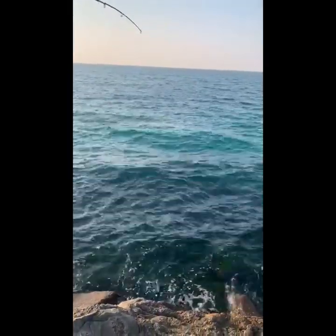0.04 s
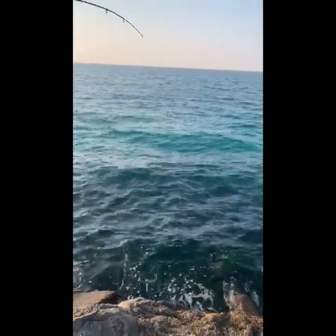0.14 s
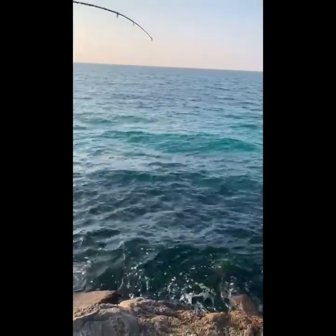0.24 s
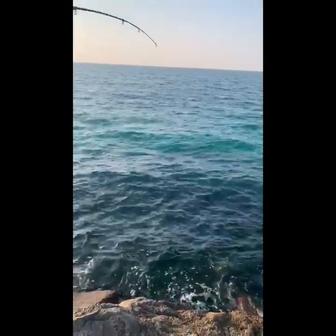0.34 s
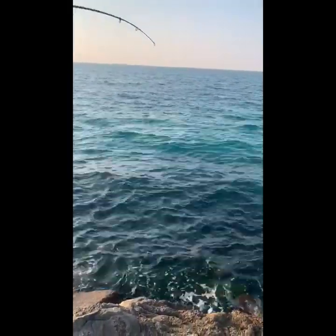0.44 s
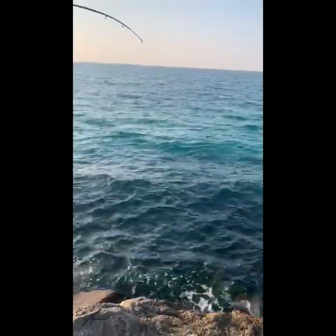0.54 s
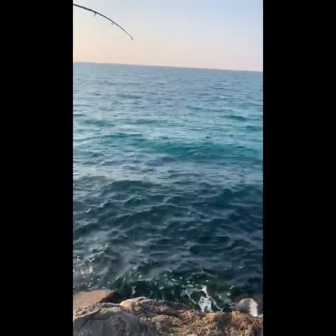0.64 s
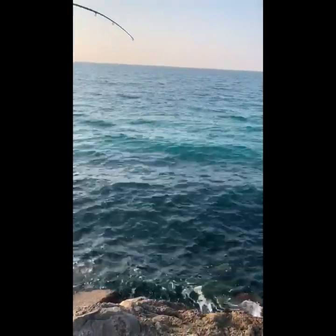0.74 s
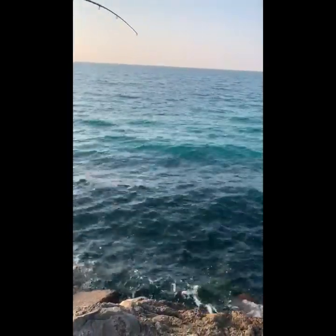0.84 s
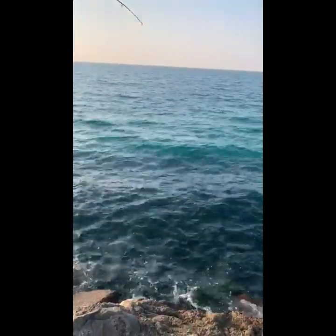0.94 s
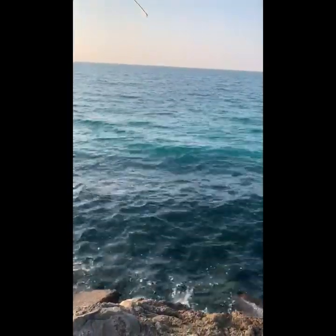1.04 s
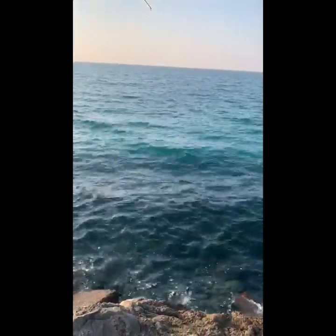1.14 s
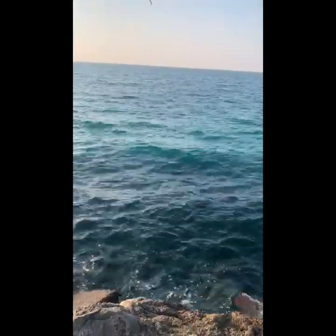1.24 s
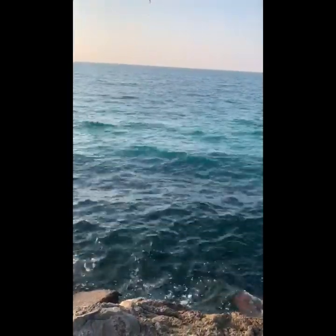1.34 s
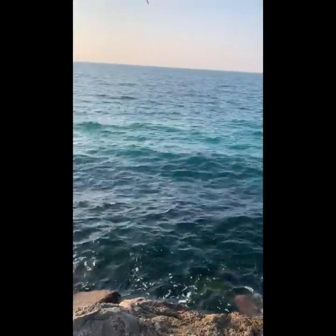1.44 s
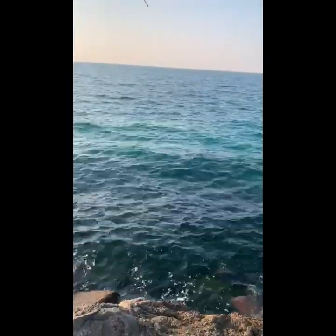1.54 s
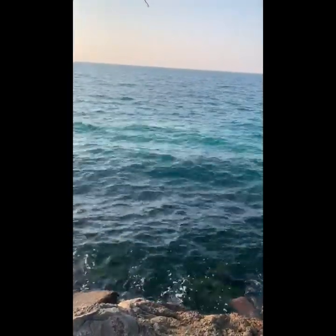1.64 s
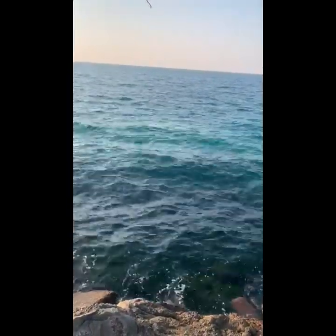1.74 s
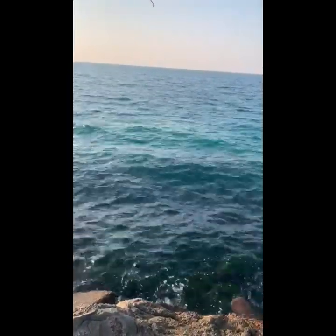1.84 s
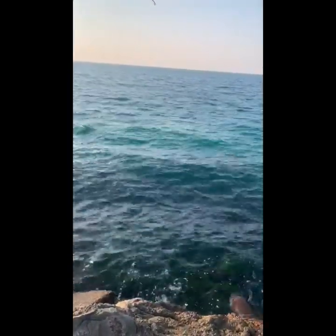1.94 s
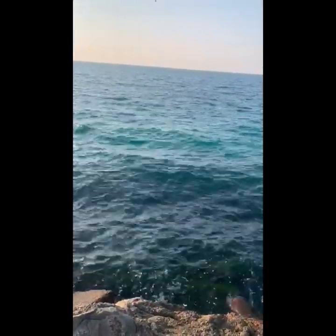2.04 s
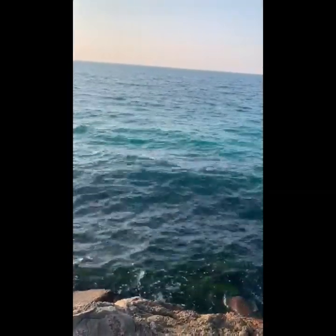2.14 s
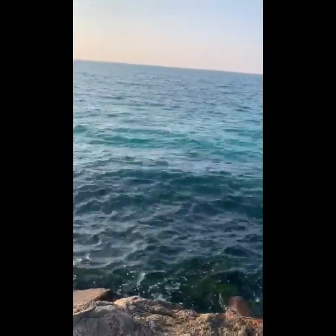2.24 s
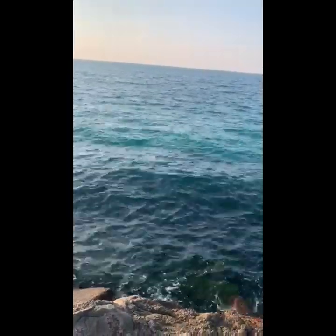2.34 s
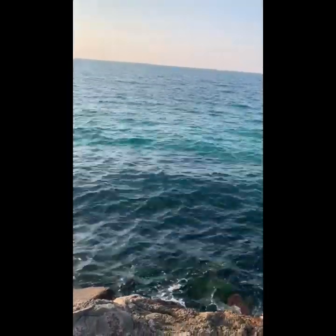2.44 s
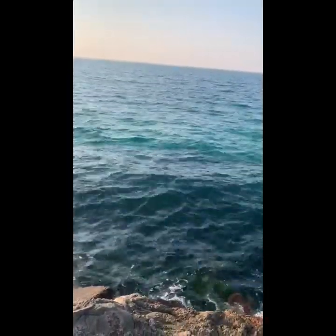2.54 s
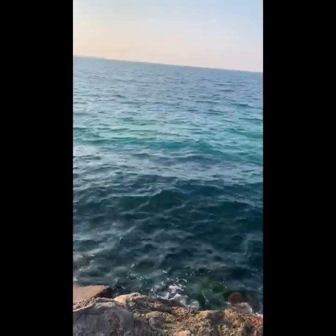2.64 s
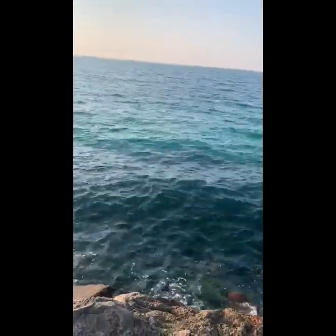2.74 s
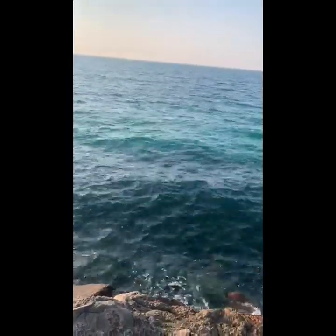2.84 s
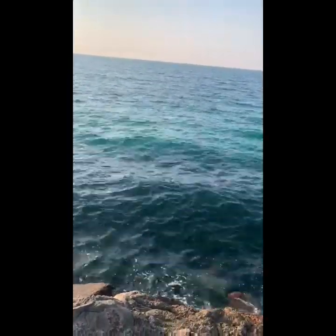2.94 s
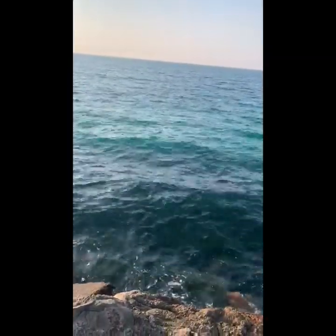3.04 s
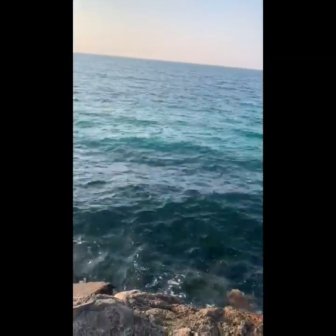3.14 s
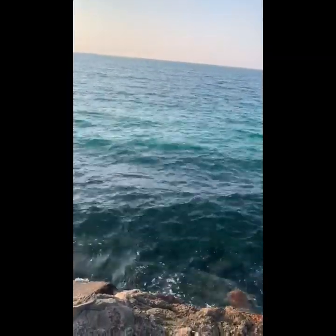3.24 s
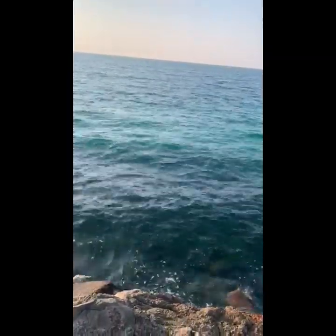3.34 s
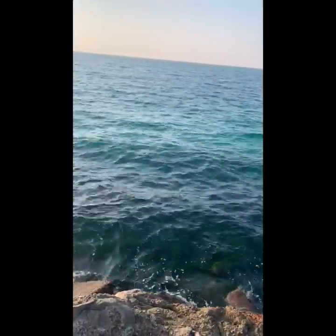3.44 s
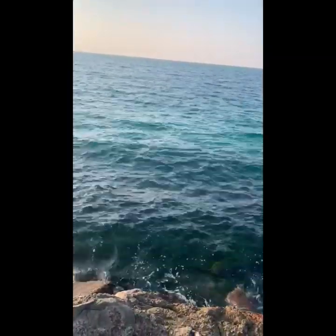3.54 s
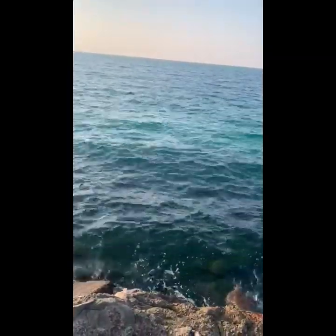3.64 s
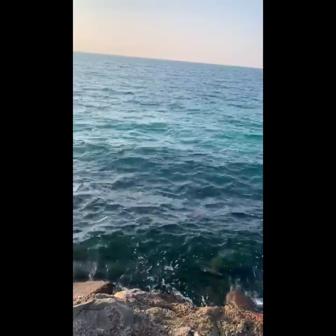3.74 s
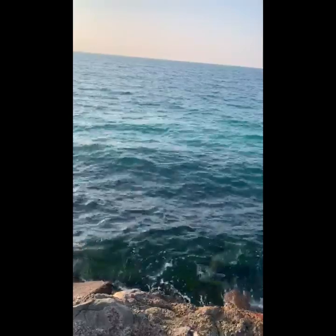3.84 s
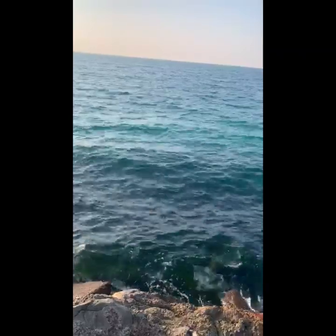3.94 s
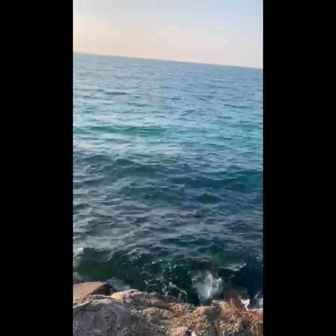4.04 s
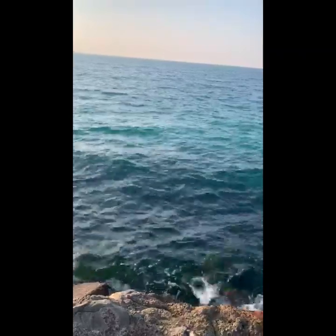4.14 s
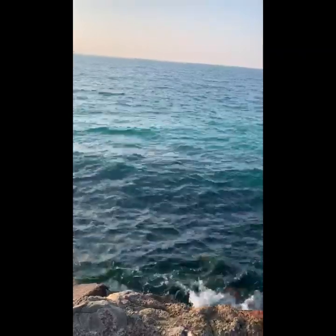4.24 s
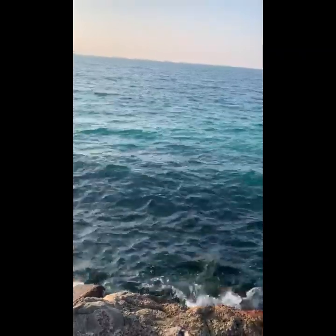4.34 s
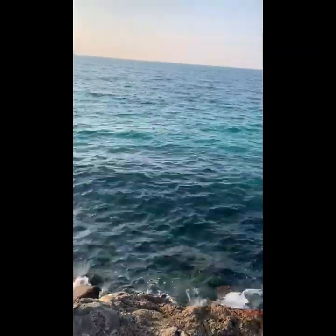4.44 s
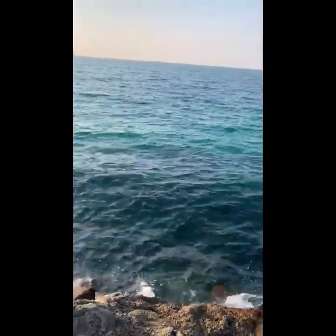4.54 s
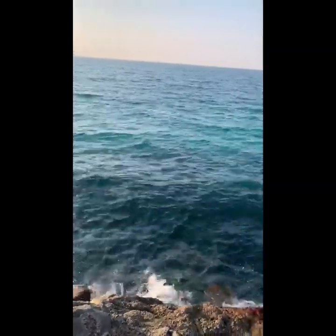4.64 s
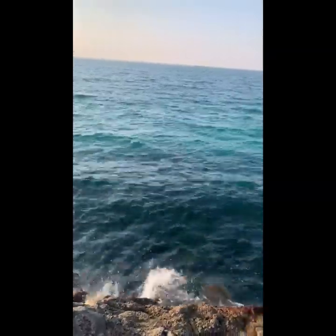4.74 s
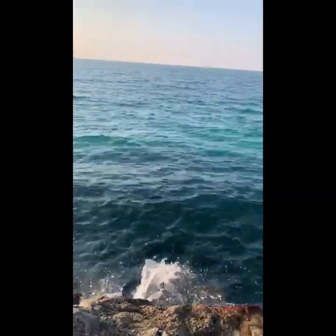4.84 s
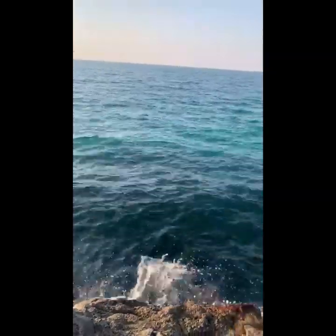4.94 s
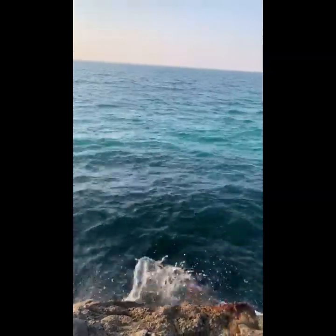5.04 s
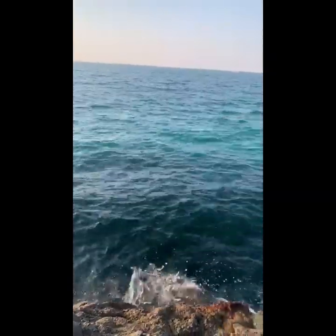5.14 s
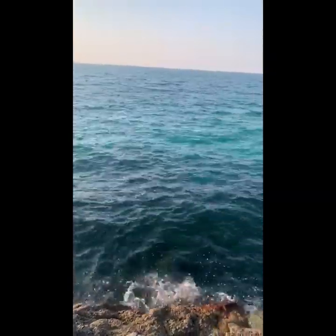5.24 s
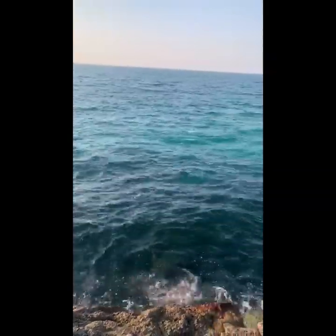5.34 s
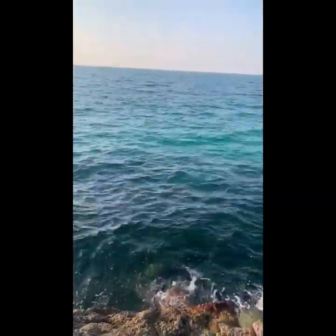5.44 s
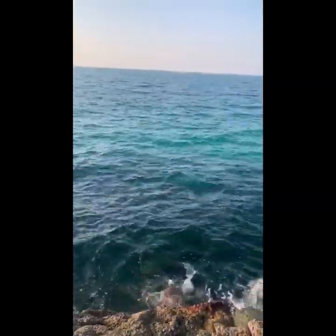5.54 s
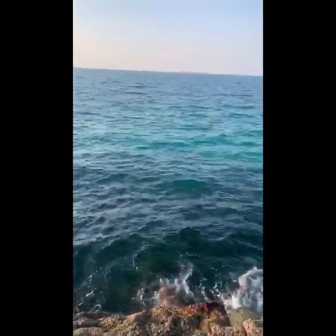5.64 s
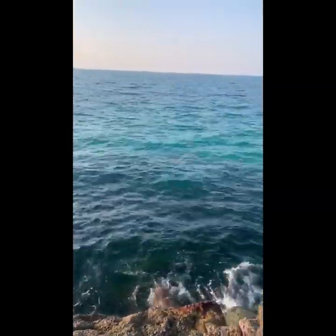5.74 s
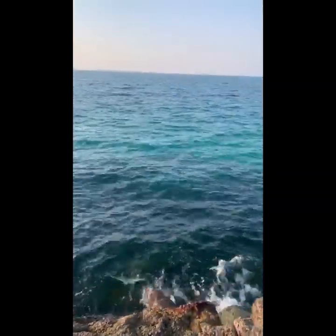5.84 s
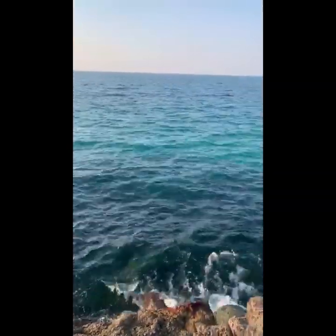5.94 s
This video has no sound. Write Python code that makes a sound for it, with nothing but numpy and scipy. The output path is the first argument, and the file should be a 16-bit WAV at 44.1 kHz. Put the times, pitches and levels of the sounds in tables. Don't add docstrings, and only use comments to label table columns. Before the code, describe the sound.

Small waves slosh and gurgle among shore rocks with foamy fizz and wind rumble, then one slaps with a hollow thump and surges.

```python
import sys
import numpy as np
from scipy import signal
from scipy.fft import rfft, irfft, dct, next_fast_len
from scipy.io import wavfile
from scipy.ndimage import uniform_filter1d

SR = 44100
rng = np.random.default_rng(int(sys.argv[2]) if len(sys.argv) > 2 else 0)


def store_wav(level_fs):
    pcm = np.round(np.clip(np.atleast_2d(level_fs), -1, 1) * 32767)
    wavfile.write(sys.argv[1], SR, pcm.T.astype(np.int16))


def boost(x):
    u = np.asarray(x, float) / 20
    return 10 ** u


N = 264159
POCKET_HALF = 2000


def evened(x):
    return x / np.sqrt(np.mean(x ** 2) + 1e-20)


def read(points, hz):
    point_hz, value = np.transpose(points)
    return np.interp(np.log(hz + 1), np.log(point_hz + 1), value)


def curve(rows, column):
    rows = np.array(rows)
    return np.interp(np.arange(N) / SR, rows[:, 0], rows[:, column])


def lift(peak_s, lift_db, length_s, rise=0.63):
    t = np.arange(N) / SR - peak_s
    return lift_db * np.exp(-(t / np.where(t < 0, rise * length_s, length_s)) ** 2)


def add(mix, start_s, sound):
    part = mix[max(round(start_s * SR), 0):][:len(sound)]
    part += sound[:len(part)]


def hiss(colour, patchy_db, flicker_db, size):
    hop = size // 4
    frames, hz = N // hop + 5, np.fft.rfftfreq(size, 1 / SR)
    a, b, c, d, patches = rng.standard_normal((frames, len(hz), 5)).T
    patches = evened(uniform_filter1d(uniform_filter1d(patches, 8, 0), 8, 1))
    flicker = evened(uniform_filter1d(rng.standard_normal(frames), 3))
    level_db = read(colour, hz)[:, None] + patchy_db * patches + flicker_db * flicker
    z = np.array([a + 1j * b, c + 1j * d]) * boost(level_db)
    return evened(signal.istft(z, nperseg=size, noverlap=size - hop)[1][:, :N])


def bubbles(lo_hz, hi_hz, cycles, per_s, spread_db, count=16):
    size = boost(spread_db * np.minimum(rng.exponential(1, N), 5))
    size = size * (rng.random(N) < per_s / SR)
    kind, out = rng.integers(0, count, N), np.zeros(N)
    for k, hz in enumerate(np.geomspace(lo_hz, hi_hz, count)):
        u = np.arange(int(4 * cycles * SR / hz)) * hz / SR / cycles
        tone = np.sin(2 * np.pi * cycles * u * (1 + 0.07 * u))
        out += signal.oaconvolve(size * (kind == k), u * np.exp(-2 * u) * tone)[:N]
    return evened(out)


def pocket(peak_db, pitch_hz, swell_s, ring_s, glide):
    t = np.arange(-POCKET_HALF, POCKET_HALF) / SR
    shape = np.exp(-(np.abs(t) / np.where(t < 0, swell_s, ring_s)) ** 1.2)
    return boost(peak_db) * shape * np.cos(2 * np.pi * pitch_hz * t * (1 + glide * np.tanh(t / 0.017)))


def scattered(x):
    echoes = rng.standard_normal(700) * np.exp(-np.arange(700) / SR / 0.014)
    return np.array([x, signal.oaconvolve(x, echoes / np.linalg.norm(echoes))[:N]])


def elsewhere(x):
    return np.array([x, np.roll(x, SR // 3)])


# time_s, surge_db (heavy water among stones), foam_db (breaking on top)
SEA = [(0.0, -37, -37.5), (0.28, -36, -47), (0.62, -34.5, -45.5), (0.72, -34.5, -50.5), (1.3, -34, -39.5),
       (1.4, -32.5, -46), (2.33, -32, -44.5), (2.82, -34, -47), (3.07, -32.5, -44.5), (3.5, -33.5, -41),
       (4.27, -28, -34.5), (4.32, -24.5, -29), (4.45, -25, -37.5), (4.75, -23.5, -39.5),
       (5.06, -24.5, -39.5), (5.32, -28, -34.5), (5.94, -31, -41.5), (5.99, -26, -41.5)]
FOLLOW = {"rumble": (-35, 0.25, -0.12), "gurgle": (-33.5, 1.045, -0.021), "wash": (-37.5, .75, 0.065),
          "spray": (-38, 0.3, .6), "fizz": (-41, 0.06, 1)}


def swell(layer, brightness):
    calm_db, surge_share, foam_share = FOLLOW[layer]
    surge_db = curve(SEA, column=1) + 32
    foam_db = curve(SEA, column=2) + 46
    return boost(calm_db + surge_share * surge_db + foam_share * foam_db + sloshes(brightness))


# freq_hz, level_db
RUMBLE = [(22, -50), (31, -28), (40, -10), (50, -12), (75, 7.5), (115, -5), (170, -5), (300, -40)]


def rumble():
    noise = hiss(RUMBLE, patchy_db=.4, flicker_db=.2, size=2048)
    return noise * swell("rumble", -2) * boost(gusts())


# freq_hz, level_db
GURGLE = [(70, -3.5), (130, 0.5), (200, 2), (270, 3.5), (380, 0.5), (600, -11.5), (1200, -36.5)]


def gurgle():
    air = scattered(bubbles(140.4, 557, cycles=1.93, per_s=120, spread_db=3.0))
    noise = hiss(GURGLE, patchy_db=0.5, flicker_db=-0.23, size=1024)
    return (0.91 * noise + 0.51 * air) * swell("gurgle", 0.043)


# freq_hz, level_db
WASH = [(200, -24), (400, -5.5), (600, -1), (900, -2), (1150, -13), (1600, -20.5), (3000, -47)]


def wash():
    air = elsewhere(bubbles(450, 1286, cycles=4.0, per_s=300, spread_db=4.0))
    noise = hiss(WASH, patchy_db=1.5, flicker_db=0.83, size=512)
    return (1.09 * noise + 0.47 * air) * swell("wash", 0.54)


# time_s, unrelated_spray_db, unrelated_fizz_db
SPREAD = [(.1, -1, -1), (.45, -0.5, -4.5), (.7, -1, -1), (1.2, -1.5, 0), (1.75, 1.5, -4.5), (2.4, 1, 3.5),
          (3.1, 0, 0.5), (3.75, -9.5, 2), (4.1, -5, 0.5), (4.4, 0.5, 4), (5.1, -1, 1.5), (5.3, 2, 4),
          (5.99, 3.5, 4.5)]


def spread(pair, column):
    pair[1] *= boost(curve(SPREAD, column))
    return pair


# freq_hz, level_db
SPRAY = [(600, -14.5), (1100, -3.5), (1450, -3), (1900, -8), (2600, -8), (3300, -8), (4500, -30.5),
         (8000, -51.5)]


def spray():
    air = elsewhere(bubbles(1200, 3800, cycles=4.0, per_s=600, spread_db=2.5))
    noise = hiss(SPRAY, patchy_db=1.5, flicker_db=-1.02, size=512)
    return spread(0.86 * noise + 0.47 * air, column=1) * swell("spray", 0.93)


# freq_hz, level_db
FIZZ = [(1500, -21), (3000, -1.5), (4200, -3.5), (6000, 2.5), (8000, -0.5), (10000, -4.5), (11400, -6.5),
        (11800, -16.5), (12400, -88)]


def fizz():
    air = elsewhere(bubbles(3500, 11000, cycles=3.1, per_s=3900, spread_db=4.5))
    noise = hiss(FIZZ, patchy_db=2.5, flicker_db=0.85, size=512)
    return spread(0.63 * noise + 0.5 * air, column=2) * swell("fizz", 0.99)


# peak_s, peak_db, pitch_hz, ring_s
GLUGS = [(0.047, -21, 136, 0.012), (0.43, -17, 316, 0.0055), (0.798, -24, 337, 0.011),
         (0.885, -20, 373, 0.01), (1.08, -12, 232, 0.005), (1.124, -19.5, 296, 0.019),
         (1.21, -20, 235, 0.011), (1.324, -23, 275, 0.011), (2.019, -17, 117, 0.0099),
         (2.24, -17, 340, 0.0038), (2.407, -23, 650, 0.0046), (2.621, -18, 121, 0.0056),
         (2.759, -19, 145, 0.0058), (2.964, -14.5, 448, 0.0029), (2.987, -15.5, 206, 0.011),
         (3.169, -41, 269, 0.012), (3.199, -25.5, 294, 0.042), (4.576, -16, 340, 0.012),
         (4.61, -15, 117, 0.0081), (4.697, -9, 210, 0.0022), (4.76, -23, 234, 0.0088),
         (4.799, -13, 240, 0.011), (4.848, -19, 202, 0.0048), (4.954, -22, 178, 0.0098),
         (5.09, -15, 133, 0.033), (5.191, -11, 170, 0.0017), (5.919, -16, 237, 0.023)]


def glugs():
    out = np.zeros(N)
    for peak_s, peak_db, pitch_hz, ring_s in GLUGS:
        sound = pocket(peak_db - 6.5, pitch_hz, 1.7 * ring_s, ring_s, glide=0.071)
        add(out, peak_s + 0.003 - POCKET_HALF / SR, sound)
    return out


# peak_s, peak_db, pitch_hz, ring_s
DROPS = [(0.062, -18.5, 784, 0.0024), (.172, -22.5, 3150, 0.0019), (.423, -26, 704, 0.0015),
         (.59, -27, 7050, 0.00057), (0.795, -31, 5100, 0.00041), (0.798, -24.5, 1510, 0.0038),
         (1.221, -31, 9600, 0.00036), (1.239, -21.5, 6800, 0.0008), (1.277, -18, 4900, 0.00085),
         (1.296, -25.5, 5580, 0.0025), (1.315, -38, 2100, 0.002), (1.367, -46, 2770, 0.0013),
         (1.389, -26, 2320, 0.0023), (1.653, -22, 5490, 0.00064), (1.656, -24, 6600, .0006),
         (2.412, -25, 580, 0.0052), (2.566, -29, 5070, 0.00063), (3.31, -36, 5900, 0.00075),
         (4.44, -41, 4040, 0.00051), (4.876, -20, 6400, .0006)]


def drops():
    out = np.zeros(N)
    for peak_s, peak_db, pitch_hz, ring_s in DROPS:
        sound = pocket(peak_db, pitch_hz, 0.15 * ring_s, ring_s, glide=0.38)
        add(out, peak_s - POCKET_HALF / SR, sound)
    return out


# peak_s, lift_db, length_s, brightness (0-1)
SLOSHES = [(0.065, 10, 0.017, 0), (0.135, -2.5, 0.12, 1.07), (0.357, 1, 0.033, .9), (0.517, 0, .05, 1),
           (0.454, 6, 0.034, 0), (0.588, 0, 0.039, 0.93), (0.831, 6.5, 0.022, 0.61), (0.916, 3, .025, .5),
           (1.098, 6.5, 0.1, 0.54), (1.328, 6.5, 0.032, 0), (1.522, 2.5, 0.051, .7), (2.408, 6, .022, 0.26),
           (2.99, 3, 0.017, 0.6), (3.09, 0.5, 0.075, 0.7), (3.207, 3, 0.12, 0.53),
           (3.985, -0.5, 0.034, 0.6), (4.353, 4, 0.032, .6), (4.7, 0.5, 0.041, 0.2),
           (4.744, 0.5, 0.032, 0.66), (4.829, 2, 0.024, 0.78), (4.877, 3, 0.016, 1.14),
           (5.48, -1.5, 0.45, 0.2), (5.7, 2.5, 0.17, -.1), (1.644, -1, .03, 1.1), (1.807, 4, 0.12, 0),
           (3.743, -1.5, .1, 0), (5.188, 4, 0.1, 0.2)]


def sloshes(brightness):
    db = np.zeros(N)
    for peak_s, lift_db, length_s, bright in SLOSHES:
        reach = np.exp(-((bright - brightness) / 0.49) ** 2)
        db += lift(peak_s, lift_db, length_s) * reach
    return db


# peak_s, lift_db, length_s
GUSTS = [(0.126, 4.5, 0.13), (0.364, 7, 0.034), (0.517, 4.5, 0.042), (0.827, 4.5, 0.049), (1.003, 4, 0.024),
         (1.22, 8.5, 0.095), (1.43, -0.5, .06), (2.425, 3.5, 0.3), (3.182, 6.5, .04), (4.14, 0, .04),
         (4.62, 8.5, .04), (4.866, 8, 0.054), (5.06, 3.5, 0.038), (5.316, 5.5, 0.12), (5.8, 12, .04)]


def gusts():
    return sum(lift(*gust) for gust in GUSTS)


# peak_s, peak_db, pitch_hz, swell_s, ring_s
THUMPS = [
    (4.3195, -2.8, 268, .0095, .007),
    (4.2945, -15, 215, .006, .004),
    (4.357, -12, 255, .006, .007),
    (4.355, -15, 850, .005, .006),
    (4.337, -17, 600, .003, .004),
    (4.309, -22, 1400, .004, .005),
]


def thumps():
    out = np.zeros(N)
    for peak_s, *shape in THUMPS:
        add(out, peak_s - POCKET_HALF / SR, pocket(*shape, glide=-.08))
    return out


# freq_hz, lead_rad
LEAD = [(400, 0), (1400, .5), (1800, 1.5), (2200, 3.3), (2900, 2.8), (3500, 3.1), (5000, 3.0), (6400, 6.1),
        (8000, 6.45), (8600, 8.5), (9200, 9.4), (10600, 9.6), (11300, 12.45)]
# freq_hz, likeness (0-1)
SAME = [(400, 1), (700, .8), (1050, .62), (1300, .88), (2200, .35), (3000, .6), (3550, .9), (4000, .68),
        (5600, .66), (6500, .92), (7800, .94), (8500, .7), (9800, .88), (11000, .75), (11400, .96),
        (12000, .97)]
# freq_hz, tilt_db
TILT = [(800, 0), (1300, -1.5), (1800, -5), (2200, 1.5), (2600, 2.5), (3500, 0.1), (5200, -2), (6000, 0.1)]


def ports(pair):
    size = next_fast_len(N)
    hz = np.fft.rfftfreq(size, 1 / SR)
    direct, other = rfft(pair, size)
    same = np.clip(read(SAME, hz), 0, 1)
    tilt = boost(read(TILT, hz) / 2)
    turn = np.exp(.5j * np.interp(hz, *np.transpose(LEAD)))
    left = direct * turn * tilt
    right = (same * direct + np.sqrt(1 - same ** 2) * other) / turn / tilt
    return irfft(np.array([left, right]), size)[:, :N]


def scene():
    sea = gurgle() + wash() + spray() + fizz() + rumble()
    return ports(sea + scattered(glugs() + drops() + thumps()))


# freq_hz, limit_db
MASK = [(300, -6), (550, -10), (800, -7), (1200, -21), (2200, -1), (3000, -7.5), (4000, -5), (5200, -2),
        (6500, -5), (7600, -4.5), (9000, -3), (10000, 0.5), (11500, -6)]
# freq_hz, step_db
STEP = [(30, -42), (200, -27), (800, -19), (1600, -16), (3000, -14), (5200, -12), (7600, -12), (9000, -7.5),
        (10300, -6), (11500, -3.5)]
# freq_hz, limit_db
FAINT = [(5000, -56), (7000, -33), (8700, -45.5), (10300, -55), (11200, -39.5), (11900, -43.5)]
SHARP = [.59, 4.87]


def joint_stereo(x, slope, wobble_db, offset=717, size=1024):
    rise = np.cumsum(np.kaiser(size + 1, 4 * np.pi))
    window = np.sqrt(np.r_[rise[:-1], rise[-2::-1]] / rise[-1])
    count = N // size + 3
    pair = np.pad([x[0] + x[1], x[0] - x[1]], ((0, 0), (size - offset, 3 * size)))
    pair = pair[:, :count * size].reshape(2, count, size)
    frames = np.concatenate([pair[:, :-1], pair[:, 1:]], 2) * window
    a, b, c, d = np.split(frames, 4, 2)
    lines = dct(np.concatenate([-c[..., ::-1] - d, a - b[..., ::-1]], 2), 4, norm="ortho")

    band = uniform_filter1d(uniform_filter1d(lines ** 2, size=28, axis=2), size=7, axis=1)
    band_db = 10 * np.log10(band[..., 8::16].repeat(16, 2).clip(1e-12))
    louder_db, hz = band_db.max(0), np.arange(size) * SR / 2 / size

    step_db = read(STEP, hz)
    limit_db = step_db - 1.5 + 2.5 * (hz > 8000) + slope * (louder_db - band_db)
    cut_db = louder_db + np.minimum(limit_db, read(MASK, hz))
    wobble = rng.standard_normal((count - 1, size // 16))
    wobble = evened(uniform_filter1d(wobble, size=4, axis=0).repeat(16, 1))
    cut_db = np.maximum(cut_db + wobble_db * wobble * (hz > 2000), read(FAINT, hz))
    step = boost(louder_db + step_db)
    sharp = np.round(np.array(SHARP) * SR / size - .7).astype(int)
    cut_db[:, sharp] -= 14 * (hz > 4200)
    step[sharp] *= .4

    kept = uniform_filter1d(lines ** 2, size=7, axis=2) > boost(2 * cut_db)
    whole = np.floor(abs(lines / step) ** .75 + .4054) ** (4 / 3)
    u, v = np.split(dct(np.sign(lines) * whole * step * kept, 4, norm="ortho"), 2, 2)
    frames = np.concatenate([v, -v[..., ::-1], -u[..., ::-1], -u], 2) * window
    both = np.pad(frames[..., :size], ((0, 0), (0, 1), (0, 0)))
    both = both + np.pad(frames[..., size:], ((0, 0), (1, 0), (0, 0)))
    mid, side = both.reshape(2, -1)[:, size - offset:][:, :N]
    return np.array([mid + side, mid - side]) / 2


def top_cut(x):
    return signal.sosfilt(signal.butter(12, 13220, fs=SR, output="sos"), x)


def record(dry):
    lowpass = signal.firwin(511, 11850, window=("kaiser", 9), fs=SR)
    edged = signal.oaconvolve(dry, lowpass[None], "same")
    mix = joint_stereo(edged, slope=2.1, wobble_db=2.5)
    return top_cut(mix)


dry = scene()
out = record(dry)
store_wav(out)
```